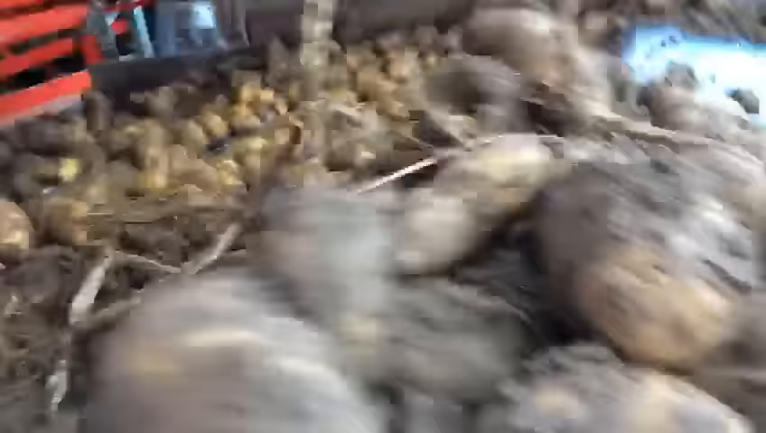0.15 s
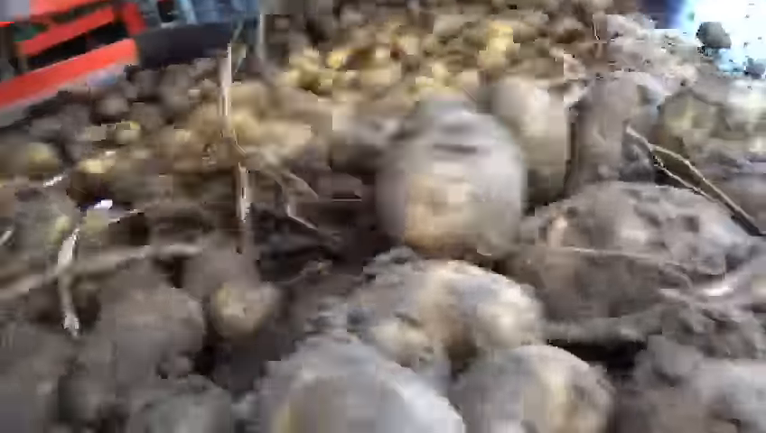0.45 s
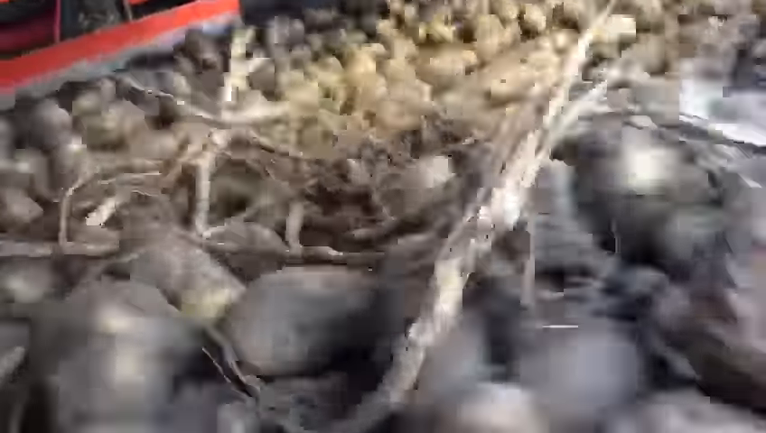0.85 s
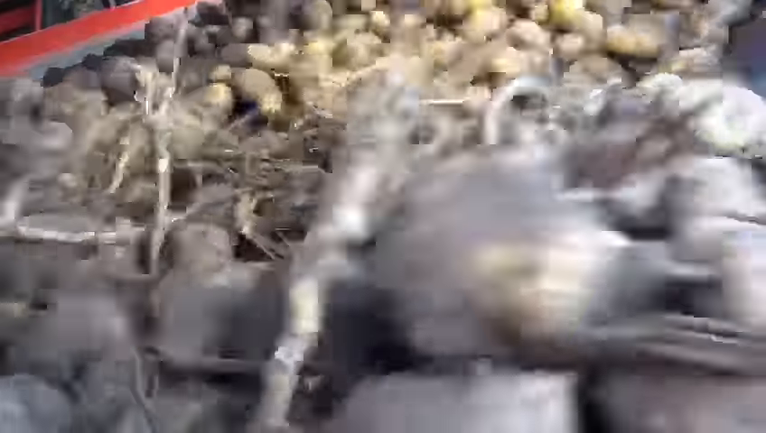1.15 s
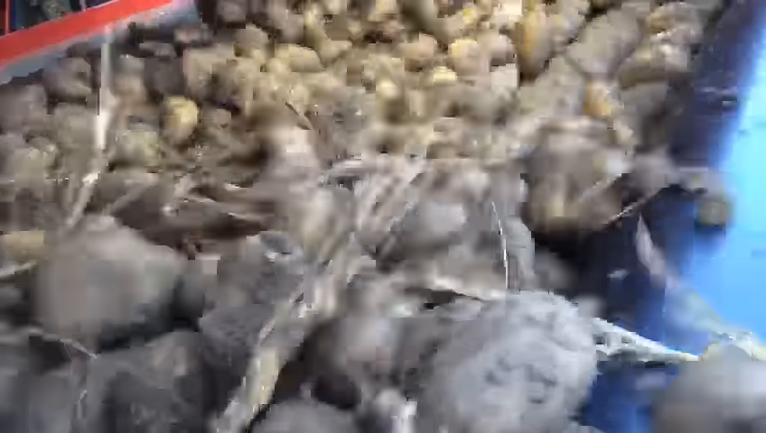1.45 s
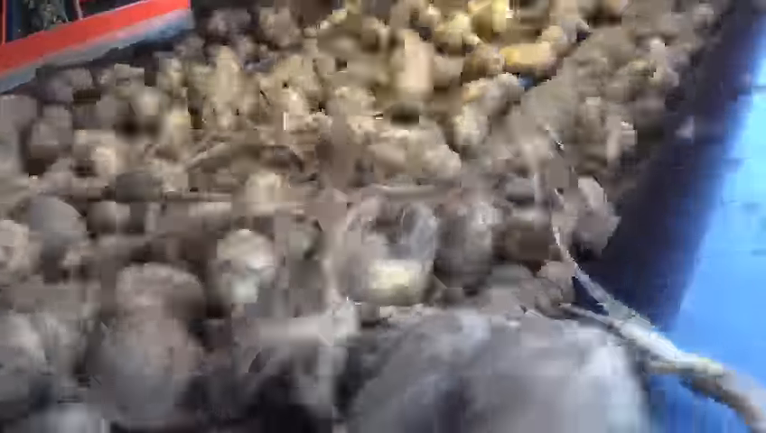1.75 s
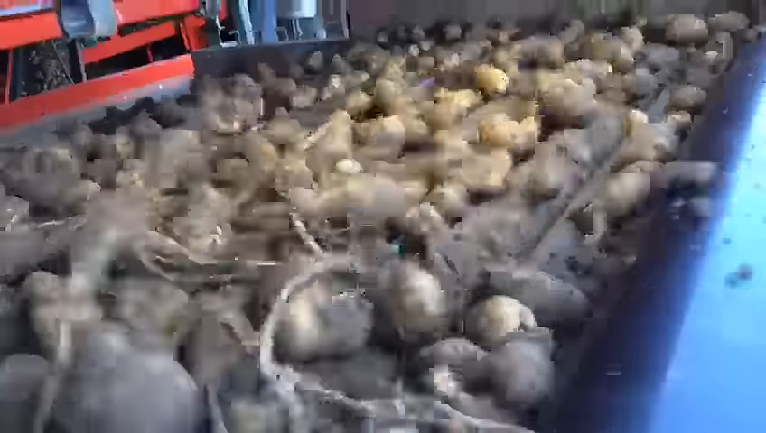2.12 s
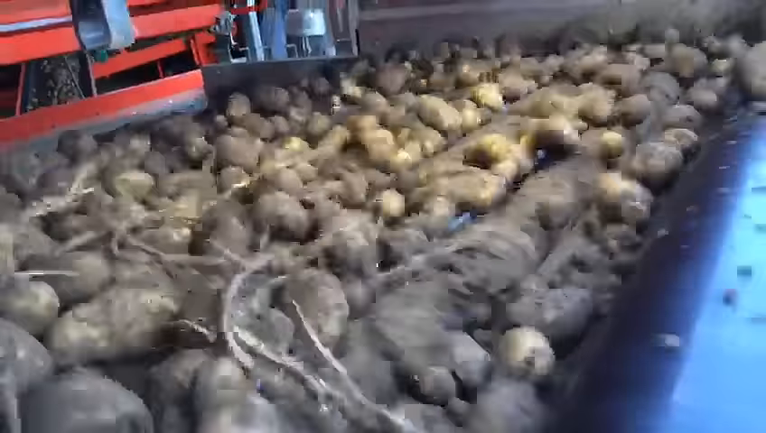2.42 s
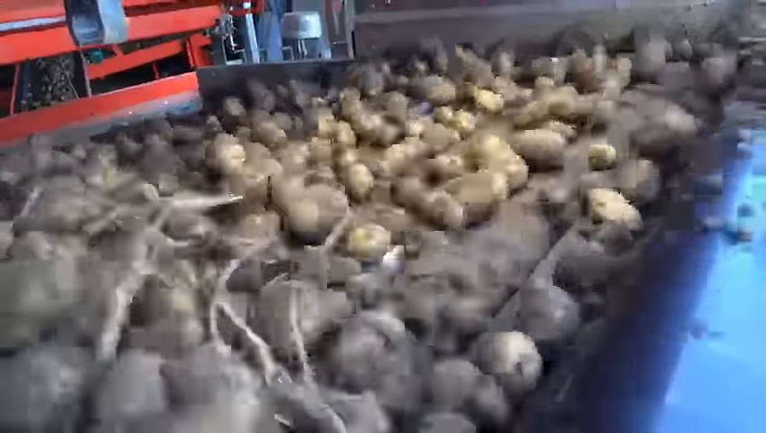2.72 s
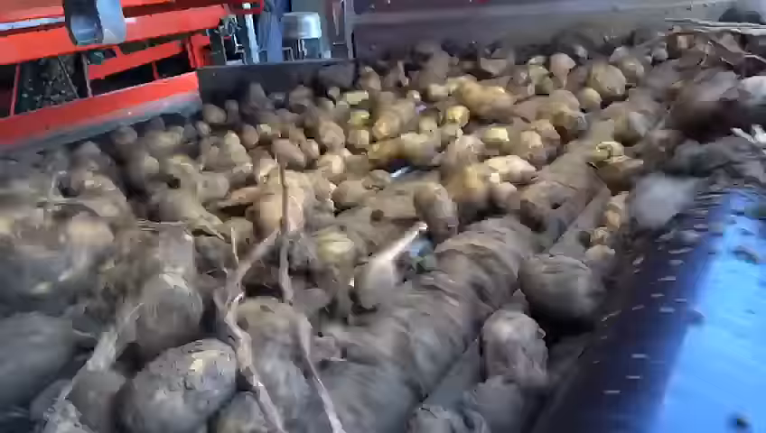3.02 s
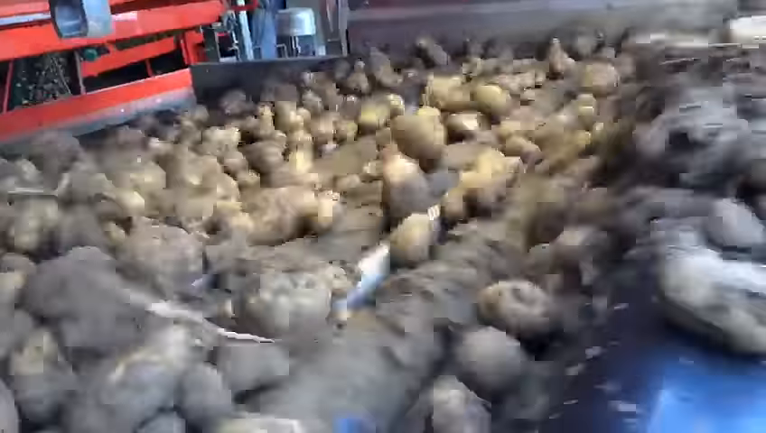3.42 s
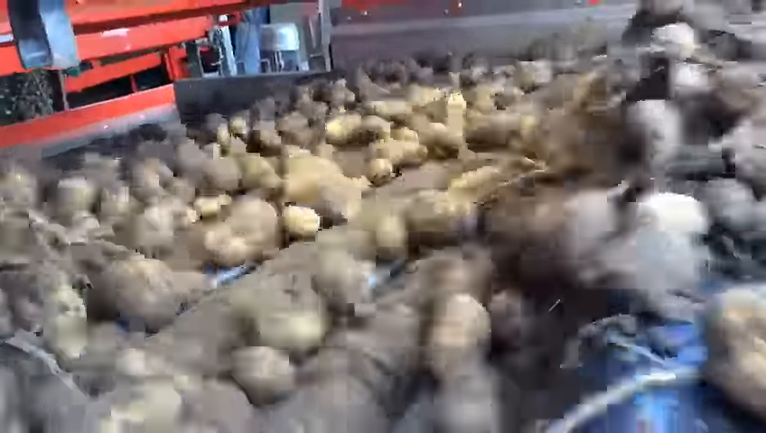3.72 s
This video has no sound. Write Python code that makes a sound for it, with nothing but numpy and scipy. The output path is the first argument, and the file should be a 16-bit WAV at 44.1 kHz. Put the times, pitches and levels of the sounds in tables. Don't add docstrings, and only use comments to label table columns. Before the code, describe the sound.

Continuous low machine drone with chain and roller rattle and faint high whine; muddy potatoes tumble dully, clods tick, stones clack and briefly squeak on bars, then hard steel knocks. Close handheld microphone, short shed echo.

```python
import sys
import numpy as np
from scipy import signal
from scipy.fft import rfft, irfft, next_fast_len
from scipy.io import wavfile
from scipy.ndimage import uniform_filter1d, map_coordinates

SR = 44100
rng = np.random.default_rng(int(sys.argv[2]) if len(sys.argv) > 2 else 0)


def unload_wav(signal):
    wavfile.write(
        sys.argv[1],
        SR,
        np.round(np.clip(np.atleast_2d(signal).T, -1, 1) * 32767).astype(np.int16),
    )


def volts(x):
    e = np.asarray(x, float) / 20
    return 10 ** e


N = 170667

# (frequency [Hz], t60 [s])
SHED_DECAY = [(300, 0.24), (2000, 0.28), (9000, 0.1)]
# (time [s], level [dB])
BELT_LOAD = [
    (0.0, -26.5),
    (0.34, -29),
    (0.62, -25),
    (1.11, -27),
    (2.13, -28),
    (2.65, -25.5),
    (3.13, -28.5),
    (3.6, -27.5),
    (3.87, -29.5),
]
# (frequency [Hz], density [dB per Hz])
ROAR_SPECTRUM = [(15, -63), (25, -22), (59, -3.5), (102, -3.5), (151, 0.5), (205, -3), (258, -4),
                 (454, -11), (1200, -30), (1560, -44), (2640, -120)]
# (frequency [Hz], density [dB per Hz])
RATTLE_SPECTRUM = [(240, -19.5), (400, -3), (499, 1), (744, -5.5), (2400, -14.5), (5330, -24.5),
                   (7740, -28), (10100, -32.5), (10800, -32.5), (14000, -80), (22000, -120)]
# (frequency [Hz], width [Hz], gain [dB])
FRAME_MODES = [(149.7, 9, 3.5), (206, 21, 4.5), (439, 4.6, 5), (525, 7.5, 3), (1000, 38, 0.5),
               (1386, 21, 4.5), (1920, 37, 2.5)]
# (frequency [Hz], level [dB rms], drive index)
DRIVE_TONES = [(2972, -61, 2), (5605, -53.5, 0), (5807, -62, 0), (6002, -61, 2), (6395, -58, 1),
               (7570, -55.5, 2), (8312, -66, 2), (8506, -70, 1)]
# (time [s], drive 0 [dB], drive 1 [dB], drive 2 [dB])
MIC_FACING = [(0, -3, 5, -4), (.25, 0, 1, -2), (.6, 2, 1, 0), (1.3, 1, -3, -1), (1.45, -8, -2, -1),
              (2.1, -7, -2, -2), (2.5, -3, -5, -1), (3.2, -5, -5, -3), (3.87, -8, -6, -5)]
# (time [s], peak [dB], centre [Hz])
CLOD_TICKS = [(0.1441, -30, 5560), (0.4244, -25.5, 7570), (0.5133, -23.5, 4000), (1.3528, -19, 5670),
              (1.355, -32, 4200), (1.538, -22.5, 7400), (1.6616, -28, 5600), (2.26, -19, 5010),
              (2.4916, -30, 4280), (2.649, -23.5, 4300), (2.734, -30, 4480), (2.7897, -33, 5150),
              (3.052, -33, 5610), (3.437, -40, 4460)]
# (time [s], peak [dB], centre [Hz])
STONE_TAPS = [(0.1437, -22, 2000), (0.3422, -22.5, 1310), (0.4536, -20, 1330), (0.4783, -16, 1560),
              (0.4994, -9, 2160), (0.502, -16, 1650), (0.529, -16, 1340), (0.651, -12, 1590),
              (0.6697, -22, 2360), (0.7178, -22, 2370), (1.1674, -21, 1250), (1.498, -39, 1580),
              (1.6232, -19, 1370), (1.706, -15, 1330), (1.8013, -30, 1400), (1.8673, -22, 2180),
              (1.8766, -26, 1340), (2.0757, -12, 1330), (2.3521, -18, 1470), (2.374, -19, 1250),
              (2.4147, -21, 1620), (2.4397, -24, 1970), (2.4897, -17, 2390), (2.5794, -10, 1250),
              (2.6194, -18, 1660), (2.7348, -17, 2230), (2.7852, -12.5, 1570), (2.8014, -14, 1540),
              (2.8747, -23.5, 1980), (3.0515, -17, 1330), (3.397, -26, 1710), (3.4088, -20, 1680),
              (3.4376, -16, 2390), (3.546, -20, 1560), (3.5672, -19, 1260)]
# (time [s], length [s], ring [dB], grit [dB])
BAR_SCRAPES = [(0.477, 0.057, -42, -37.5), (0.654, 0.039, -31, -32.5), (0.696, 0.06, -33, -48),
               (1.796, 0.018, -41, -35.5), (1.853, 0.016, -50, -32.5), (2.111, 0.16, -46, -34),
               (2.347, 0.12, -35, -30.5), (2.488, 0.16, -36.5, -32), (2.756, 0.11, -32.5, -30),
               (3.041, 0.16, -46.5, -34), (3.388, 0.072, -36.5, -33), (3.451, 0.068, -34.5, -39),
               (3.542, 0.065, -44.5, -32.5)]
# (time [s], length [s], level [dB])
BAR_SQUEAKS = [(.659, .032, -32), (.705, .006, -39), (.717, .022, -31), (.75, .015, -39), (2.352, .05, -43),
               (2.487, .07, -37), (2.59, .024, -35), (2.635, .05, -42), (2.771, .058, -34),
               (2.84, .03, -42), (3.435, .068, -35)]
# (frequency [Hz], width [Hz], gain [dB])
BAR_MODES = [(907, 12, 7), (1325, 34, 2.5), (1580, 21, 5), (1680, 98, 0), (2005, 64, -12.5),
             (2800, 100, -5), (3160, 48, -8.5), (4110, 44, -9)]
# (frequency [Hz], width [Hz], gain [dB])
SINGING_MODES = [(2330, 90, -4), (2480, 80, -3), (2845, 70, -4), (3105, 50, -8), (3725, 45, -8),
                 (4300, 60, -15)]
# (frequency [Hz], density [dB per Hz])
GRIT_SPECTRUM = [(400, -20), (900, 5), (2500, -1), (4000, -11), (9000, -38.5)]
# (time [s], peak [dB], brightness [dB per octave])
PANEL_KNOCKS = [(.079, -20, -7.5), (0.146, -26, 6.5), (0.338, -19, -4), (0.9, -25, -2), (1.163, -13, -6.5),
                (1.346, -23.5, 1.5), (1.538, -21, -4.5), (1.809, -25, -2), (2.23, -20.5, -1),
                (2.411, -25.5, 3), (2.602, -16.5, -7), (2.893, -4.5, -11), (2.934, -15, -4),
                (3.277, -13.5, -2.5), (3.41, -16, -7), (3.6919, 0.5, -3.5), (3.6941, -1, -4),
                (3.7038, -11, 3), (3.712, -26, -15)]
# (frequency [Hz], gain [dB], t60 [s])
PANEL_MODES = [(775, -14, .08), (1020, 1, .05), (1120, 2, .025), (1345, -2, .04), (1600, -12, .04),
               (1895, -11, .16), (2110, -7, .05), (2470, -3, .05), (2972, -15, .2), (3386, -13, .06),
               (3800, -15, .045), (4200, -18, .09), (5335, -17, .06), (6207, -20, .04)]
# (frequency [Hz], density [dB per Hz])
CLATTER_SPECTRUM = [(500, -26), (900, 6.5), (1400, -5), (2500, 2.5), (3500, -15), (8000, -18)]
# (time [s], peak [dB], pitch [Hz])
HEAVY_DROPS = [(0.062, -3.5, 148.5), (0.101, -5, 204), (0.246, -7, 152), (0.49, -5, 189), (.8, -13, 301),
               (0.723, -7.5, 157), (0.858, -5.5, 213), (0.882, -6.5, 72), (1.082, -4.5, 202),
               (1.177, -9, 72), (1.27, -8, 155.6), (1.41, -9, 125), (1.52, -9, 154), (1.704, -9, 184.5),
               (1.761, -12.5, 80.4), (1.832, -21, 126), (1.928, -9, 138), (2.332, -3.5, 150.3),
               (2.371, -5.5, 209), (2.469, -11.5, 77.5), (2.621, -14, 104), (2.739, -10.5, 168),
               (3.08, -8, 227), (3.211, -14.5, 123), (3.411, -13, 335), (3.42, -7, 158), (3.501, -16, 158),
               (3.568, -12.5, 525), (3.811, -12, 218)]
# (time [s], peak [dB], pitch [Hz])
LIGHT_DROPS = [(0.384, -20, 326), (0.629, -17, 264), (0.806, -16.5, 264), (0.909, -14, 350),
               (1.107, -17, 297), (2.406, -21, 264), (2.619, -21, 280), (3.14, -16, 390), (3.472, -16, 327)]


def unit(x):
    return x / np.sqrt(np.mean(x ** 2) + 1e-20)


def along(points, hz):
    point_hz, value = np.transpose(points)
    return np.interp(np.log(hz + 1), np.log(point_hz + 1), value)


def wobble(rate_hz):
    knots = rng.standard_normal(int(N * rate_hz / SR) + 4)
    return map_coordinates(knots, [np.arange(N) * rate_hz / SR])


def filtered(x, response):
    size = next_fast_len(N + SR // 2)
    return irfft(rfft(x, size) * response(np.fft.rfftfreq(size, 1 / SR)), size)[..., :N]


def resonances(modes):
    def response(f):
        total = 0
        for k, (hz, width_hz, db) in enumerate(modes):
            loss = 1j * f * width_hz
            total = total + (-1) ** k * volts(db) * loss / (hz * hz - f * f + loss)
        return total
    return response


def rush(response, patchy_db):
    z = signal.stft(rng.standard_normal(N), nperseg=512)[2]
    field = uniform_filter1d(rng.standard_normal(z.shape), 6, 0)
    field = uniform_filter1d(field, 8, 1)
    noise = signal.istft(z * volts(patchy_db * unit(field)), nperseg=512)[1][:N]
    return unit(filtered(noise, response))


def grains(start_s, hz, cycles, size, span, rise_cycles=0.12):
    t = np.arange(span) / SR
    turns = hz[:, None] * t
    wave = size[:, None] * np.sin(2 * np.pi * turns) * volts(-60 * turns / cycles)
    wave = wave * (1 - t * SR / span) * (1 - np.exp(-turns / rise_cycles))
    at = (start_s * SR).astype(int)[:, None] + np.arange(span)
    return np.bincount(at.ravel(), wave.ravel(), N + SR)[:N]


def load_db():
    return np.interp(np.arange(N) / SR, *np.transpose(BELT_LOAD))


def shed(x):
    hz, t, z = signal.stft(rng.standard_normal(SR // 2), SR, nperseg=256)
    decay = volts(-60 * t / along(SHED_DECAY, hz)[:, None])
    tail = signal.istft(z * decay, SR, nperseg=256)[1]
    delayed = np.pad(x, (300, 0))
    return signal.fftconvolve(delayed, tail / np.linalg.norm(tail))[:N]


def machine():
    roar_db, rattle_db = 6.5, -2.5
    roar_grows, rattle_grows = 0.11, 0.49
    load = load_db()
    mean_db = load.mean()
    swing_db = load - mean_db

    def frame(f):
        return 1 + sum((volts(db) - 1) / (1 + (2 * (f - hz) / width_hz) ** 2) for hz, width_hz, db in FRAME_MODES)

    roar = rush(lambda f: volts(along(ROAR_SPECTRUM, f)) * frame(f), patchy_db=1.0)
    roar = roar * volts(roar_grows * swing_db + 0.6 * wobble(9.1))
    rattle = rush(lambda f: volts(along(RATTLE_SPECTRUM, f)) * frame(f), patchy_db=1.8)
    rattle = rattle * volts(rattle_grows * swing_db + 0.66 * wobble(9) + 0.43 * wobble(40))
    return volts(mean_db) * (volts(roar_db) * roar + volts(rattle_db) * rattle)


def whine():
    t = np.arange(N) / SR
    facing_s, *facing_db = np.transpose(MIC_FACING)
    out = np.zeros(N)
    for hz, db, drive in DRIVE_TONES:
        level_db = db + np.interp(t, facing_s, facing_db[drive]) + 1.2 * wobble(9.8)
        out += np.sqrt(2) * volts(level_db) * np.sin(2 * np.pi * hz * t + 0.8 * wobble(10))
    return out


def pings():
    pings_per_s, ping_db, ping_cycles = 70, -14.5, 120
    r = rng.random((round(N / SR * pings_per_s), 3))
    modes_hz = np.array([hz for hz, *_ in PANEL_MODES[:9] + BAR_MODES[:6]])
    hz = modes_hz[(r[:, 1] * 15).astype(int)]
    size = volts(10 * r[:, 2] ** 2) * 1000 / hz
    streaks = grains(r[:, 0] * N / SR, hz, ping_cycles, size, span=3000, rise_cycles=1.5)
    return unit(streaks) * volts(load_db() + ping_db)


def ticks():
    tick_db, tick_t60_s = -7, 0.038
    tap_db, tap_t60_s, tap_ring_db = -12.5, 0.03, -3
    crumbs_per_s, crumb_db = 60, -37
    out, t = np.zeros(N + SR), np.arange(SR // 20) / SR
    events = [(s, db + tick_db, hz, tick_t60_s) for s, db, hz in CLOD_TICKS]
    events += [(s, db + tap_db, hz, tap_t60_s) for s, db, hz in STONE_TAPS]
    for s, db, hz, t60_s in events:
        band = signal.butter(1, [hz * 0.69, min(hz * 1.29, 20000)], "bandpass", fs=SR)
        burst = unit(signal.lfilter(*band, rng.standard_normal(len(t))))
        if hz < 2500:
            burst = burst + volts(tap_ring_db) * np.sin(2 * np.pi * hz * t)
        out[round(s * SR):][:len(t)] += volts(db - 60 * t / t60_s) * (1 - np.exp(-t / 0.00065)) * burst
    r = rng.random((int(N / SR * crumbs_per_s), 3))
    crumb_size = volts(crumb_db + 7.0 * r[:, 2] ** 2)
    return out[:N] + grains(r[:, 0] * N / SR, 2500 + 6000 * r[:, 1], 36, crumb_size, span=200)


def scrapes():
    slips_per_s, edge_s = 400, 0.009
    squeak_hz, squeak_db = 2372, -2
    t = np.arange(N) / SR

    def push(rows, db):
        shapes = [np.clip(np.minimum(t - s, (s + length_s - t) / 2 + edge_s) / edge_s, 0, 1)
                  for s, length_s, *_ in rows]
        return volts(db) @ shapes

    ring_db, grit_db = np.transpose(BAR_SCRAPES)[2:]
    slips = (rng.random(N) < slips_per_s / SR) * rng.standard_normal(N)
    rub = unit(unit(slips) + 0.73 * rng.standard_normal(N))
    sing = push(BAR_SQUEAKS, np.transpose(BAR_SQUEAKS)[2])
    paths = [(resonances(BAR_MODES), push(BAR_SCRAPES, ring_db)),
             (lambda f: volts(along(GRIT_SPECTRUM, f)), push(BAR_SCRAPES, grit_db)),
             (resonances(SINGING_MODES), sing)]
    tone = np.sin(2 * np.pi * squeak_hz * t + 1.3 * wobble(60))
    out = np.sqrt(2) * volts(squeak_db + 3.2 * wobble(70)) * tone * sing
    for response, force in paths:
        pushed = rub * volts(1.5 * wobble(50)) * force
        out = out + filtered(pushed, response) / np.std(filtered(rub, response))
    return out


def knocks():
    knock_db, crack_db, crack_t60_s = -9.5, -0.5, 0.11
    clatter_db, clatter_t60_s = -1, 0.04
    rise_s, damped_s = 0.00088, 0.045
    out, t = np.zeros(N + SR), np.arange(SR // 4) / SR
    shake = 0.5 * wobble(90)
    clatter = unit(filtered(rng.standard_normal(N), lambda f: volts(along(CLATTER_SPECTRUM, f))))
    for s, db, bright_db in PANEL_KNOCKS:
        strike = np.zeros(len(t))
        for hz, mode_db, t60_s in PANEL_MODES:
            level_db = mode_db + rng.normal(0, 1.0) + bright_db * np.log2(hz / 1000)
            phase = shake[round(9000 * rng.random()):][:len(t)]
            strike += volts(level_db - 60 * t / t60_s) * np.sin(2 * np.pi * hz * (s + t) + phase)
        strike += volts(crack_db + 1.6 * bright_db - 60 * t / crack_t60_s) * rng.standard_normal(len(t))
        lesser = np.roll(clatter, -round(s * SR))[:len(t)]
        strike += volts(clatter_db + bright_db - 60 * t / clatter_t60_s) * lesser
        shape = (1 - np.exp(-t / rise_s)) / (1 + (t / damped_s) ** 4)
        out[round(s * SR):][:len(t)] += volts(db + knock_db) * strike * shape
    return filtered(out[:N], lambda f: 1 / (1 + (f / 6000) ** 3))


def potatoes():
    thud_cycles, thud_db, light_db = 7.4, -0.5, 4.5
    tumbles_per_s, tumble_hz, tumble_db = 120, 525, -7
    drops = HEAVY_DROPS + [(s, db + light_db, hz) for s, db, hz in LIGHT_DROPS]
    s, db, hz = np.transpose(drops)
    thuds = grains(s, hz, 3 * thud_cycles, volts(db + thud_db), span=8000, rise_cycles=1.0)
    r = rng.random((int(N / SR * tumbles_per_s), 4))
    normal = np.sqrt(-2 * np.log(r[:, 1] + 1e-9)) * np.cos(2 * np.pi * r[:, 2])
    bump_hz = tumble_hz * np.exp(0.6 * normal)
    bumps = grains(r[:, 0] * N / SR, bump_hz, 4.3, volts(13.3 * r[:, 3] ** 2), span=1500)
    return thuds + unit(bumps) * volts(load_db() + tumble_db)


def scene():
    echo_db = -12.5
    sharp = knocks() + ticks() + scrapes() + pings()
    return (sharp + volts(echo_db) * shed(sharp) + machine() + potatoes() + whine())[None]


def top_cut(x):
    return signal.sosfilt(signal.butter(12, 10920, fs=SR, output="sos"), x)


def record(dry):
    low_cut_hz, high_cut_hz, ceiling = 18, 10600, 0.97
    edge_hz, top_hz, top_open = 10570, 11020, 1.05
    dry = filtered(dry, lambda f: (f / low_cut_hz) ** 2 / (1 + (f / low_cut_hz) ** 2))
    dry = filtered(dry, lambda f: 1 / (1 + (f / high_cut_hz) ** 24))
    dry = dry / (1 + np.abs(dry / ceiling) ** 6) ** (1 / 6)
    gate = uniform_filter1d(1.0 * (wobble(14) > top_open), size=512)
    top = gate * filtered(dry, lambda f: (f >= edge_hz) & (f < top_hz))
    return top_cut(filtered(dry, lambda f: f < edge_hz) + top)


dry = scene()
out = record(dry)
unload_wav(out)
```